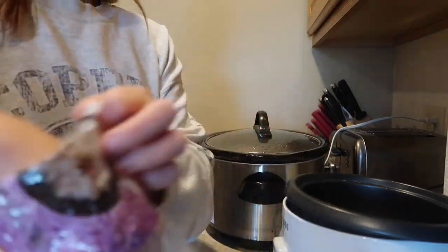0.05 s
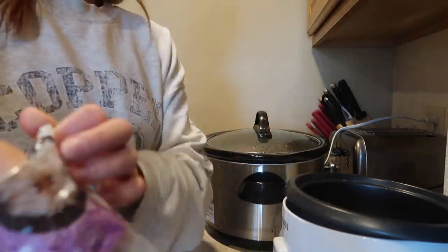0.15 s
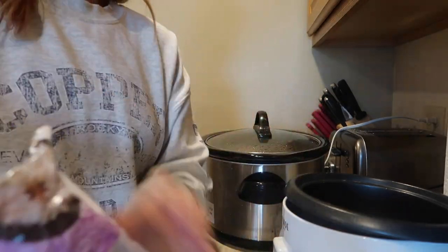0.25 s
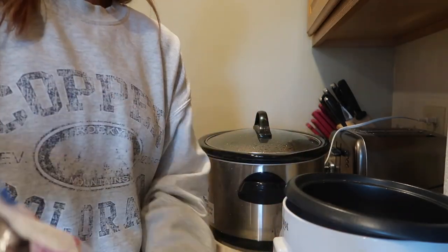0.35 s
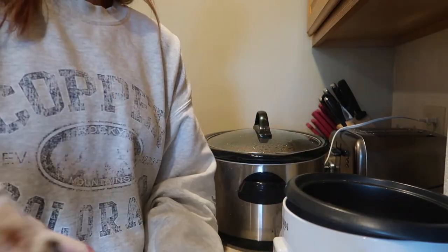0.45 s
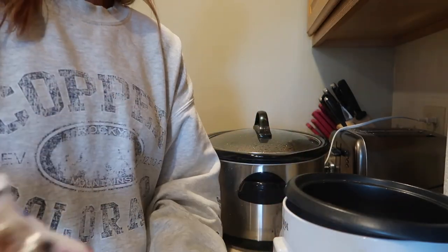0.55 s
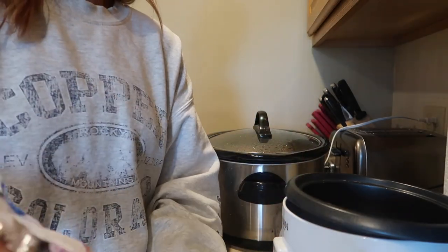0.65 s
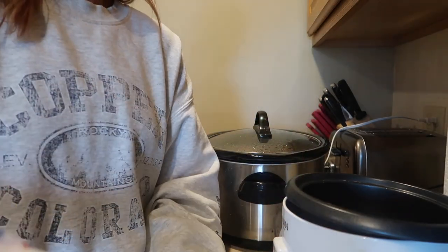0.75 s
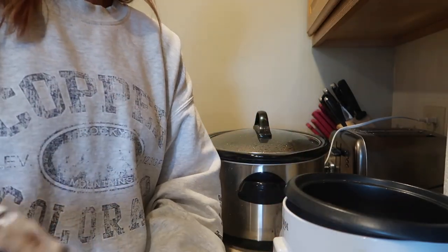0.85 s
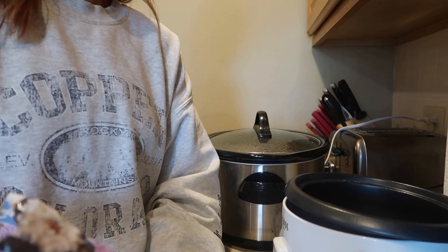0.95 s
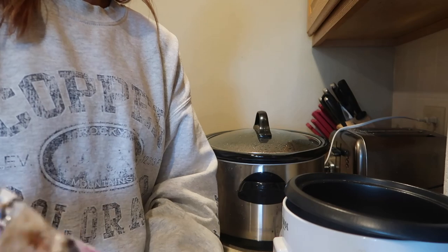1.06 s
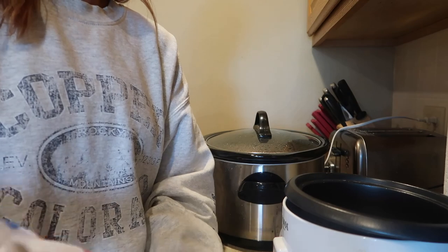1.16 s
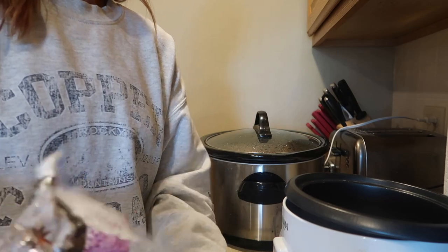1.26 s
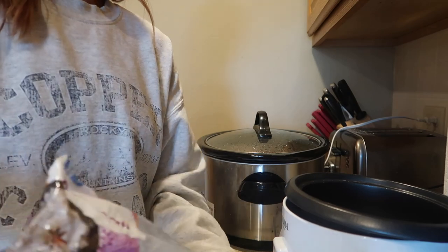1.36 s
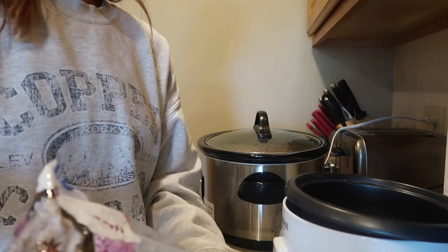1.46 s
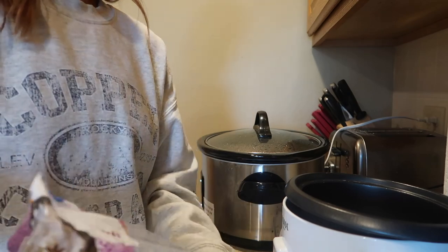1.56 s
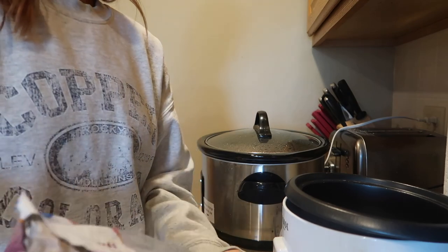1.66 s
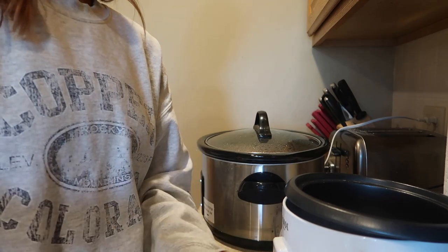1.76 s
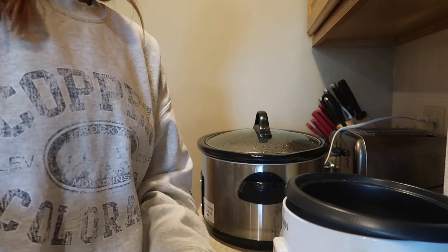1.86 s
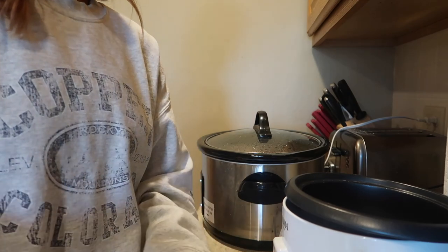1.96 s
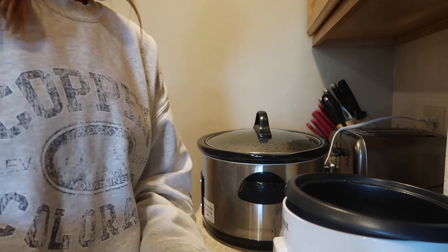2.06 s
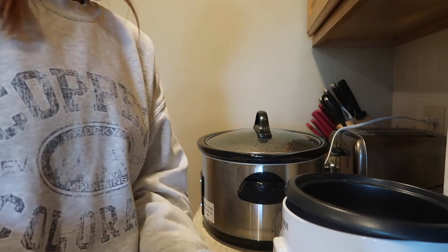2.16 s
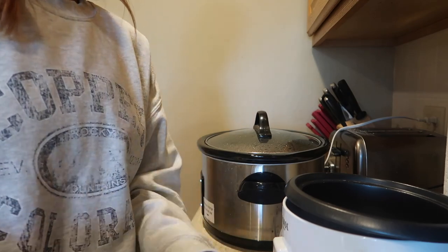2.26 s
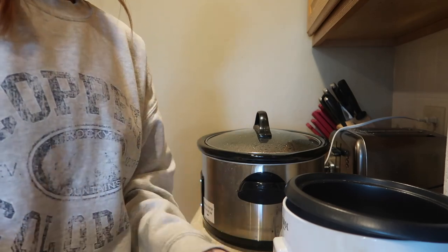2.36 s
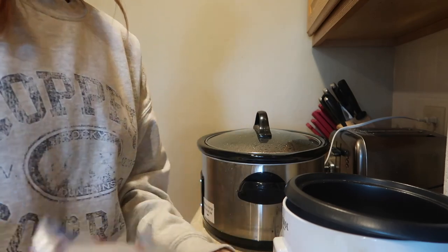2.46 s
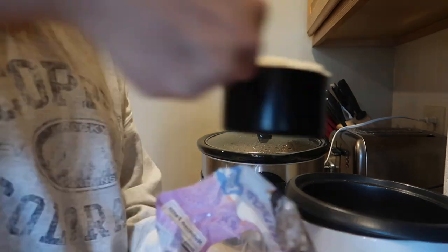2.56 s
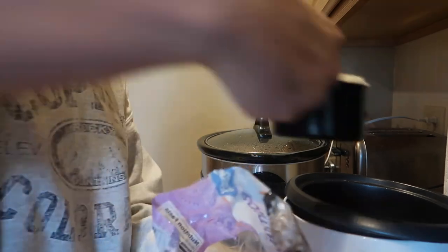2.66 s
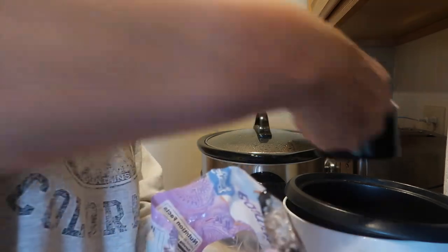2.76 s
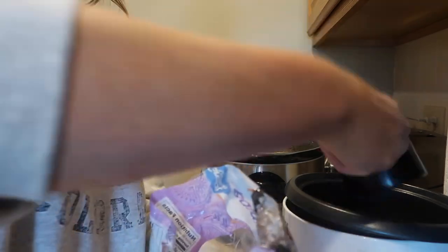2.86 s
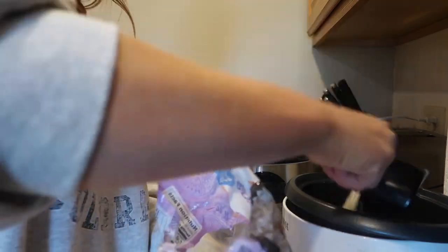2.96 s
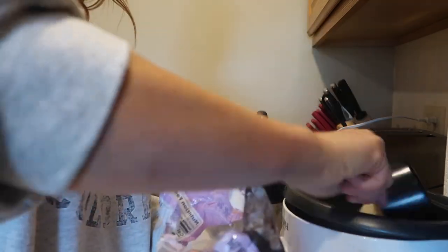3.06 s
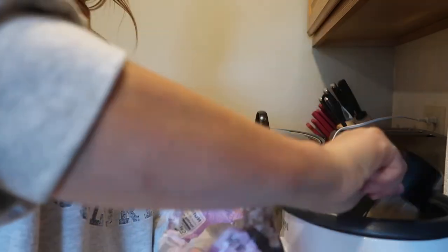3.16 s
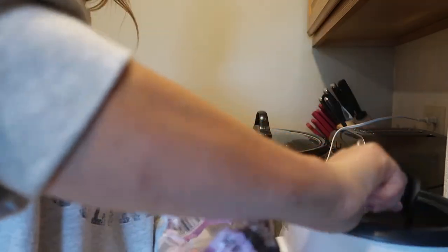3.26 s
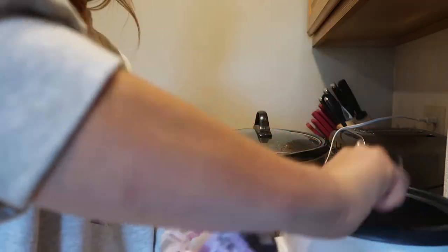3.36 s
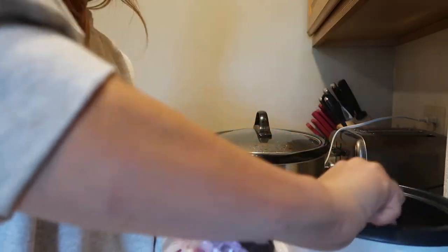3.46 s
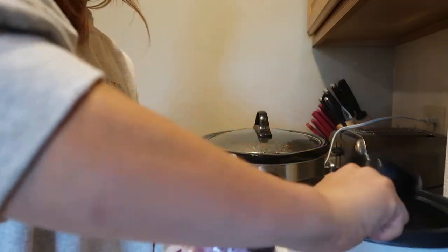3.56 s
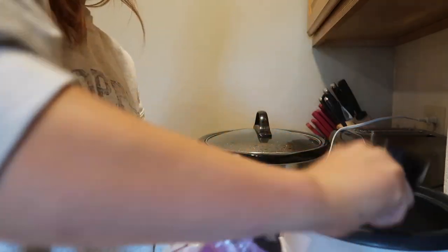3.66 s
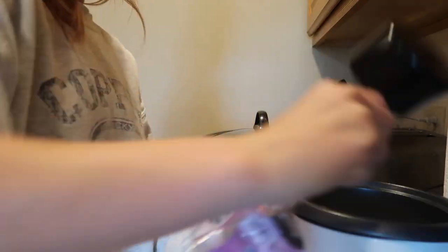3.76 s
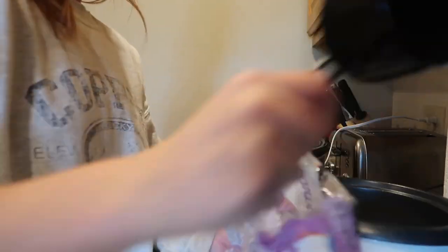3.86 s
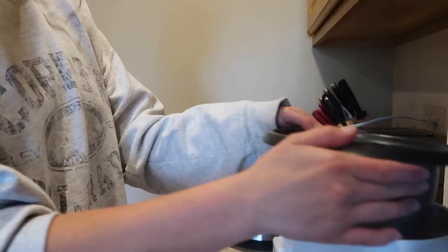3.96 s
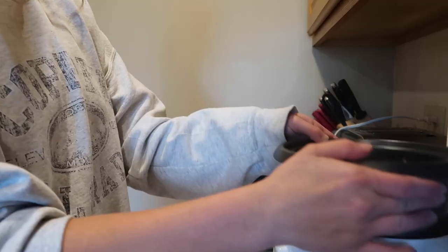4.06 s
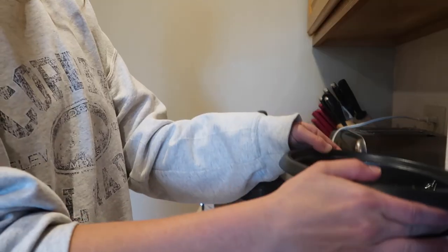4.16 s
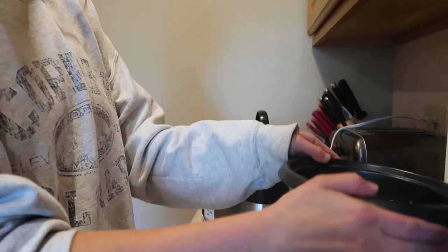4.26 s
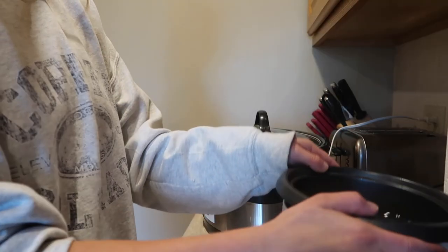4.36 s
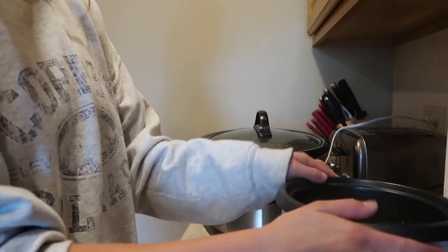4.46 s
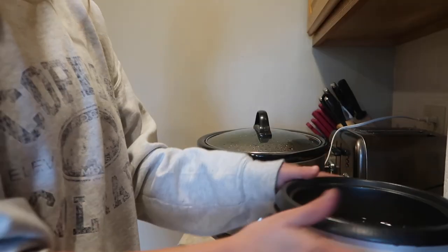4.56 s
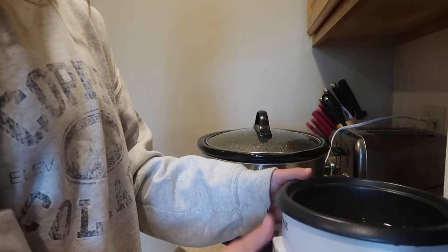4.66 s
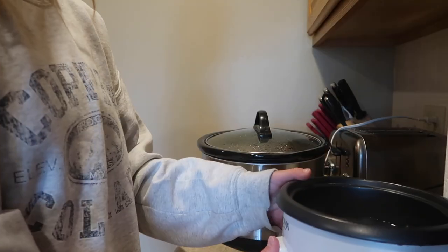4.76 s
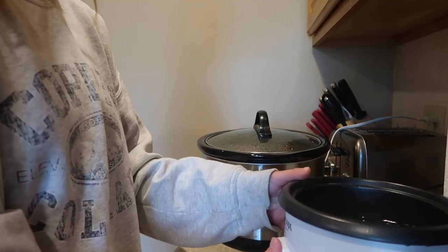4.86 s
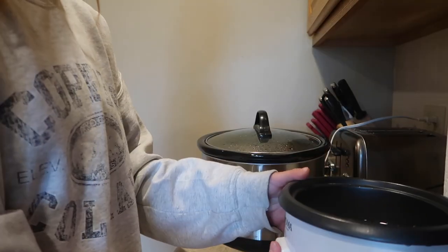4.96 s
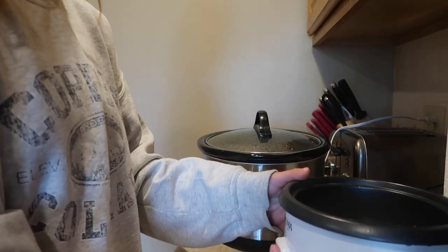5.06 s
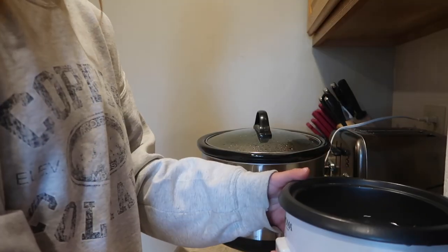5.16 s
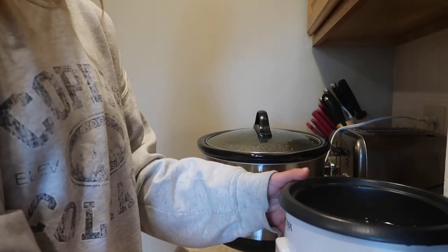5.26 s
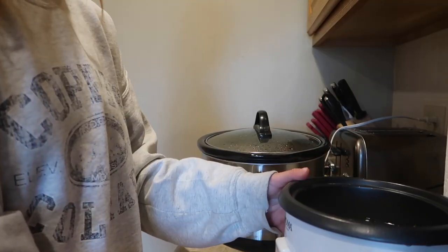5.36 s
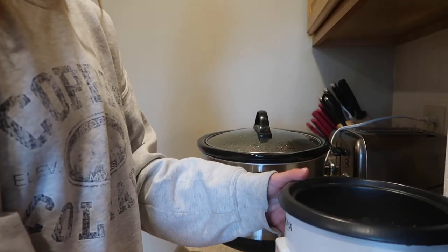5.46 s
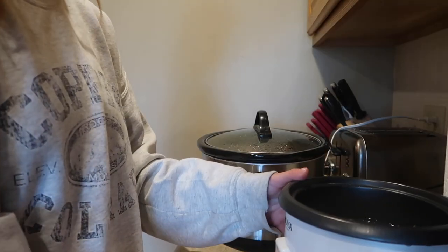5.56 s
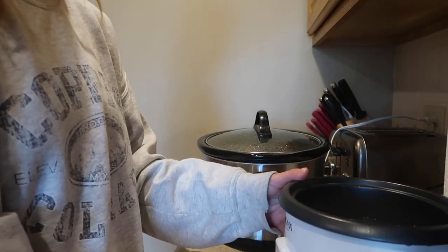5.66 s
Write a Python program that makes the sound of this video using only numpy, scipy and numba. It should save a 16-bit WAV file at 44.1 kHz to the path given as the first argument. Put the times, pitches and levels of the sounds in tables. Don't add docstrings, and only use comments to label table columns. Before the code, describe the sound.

Very close to a small stereo camera in a kitchen, a plastic bag of rice is crumpled with dense crackles and sharp snaps over low counter bumps. A cup knocks, grains burst brightly into a thin metal pot and quickly thin out. The cup clacks on the rim, the pot is shaken and set down with a boomy thud. Faint fridge hum, tiny motor ticks and one last knock end it.

```python
import sys
import numpy as np
from scipy import signal
from scipy.fft import rfft, irfft
from scipy.io import wavfile
from numba import njit

SR = 44100
rng = np.random.default_rng(int(sys.argv[2]) if len(sys.argv) > 2 else 0)


def inscribe(sig):
    pcm = np.round(np.clip(np.atleast_2d(sig).T, -1, 1) * 32767)
    wavfile.write(sys.argv[1], SR, pcm.astype(np.int16))


def invert_db(x):
    u = np.asarray(x, float) / 20
    return 10 ** u


N = 251370
TIME = np.arange(N) / SR


def table(rows, at, log=False):
    x, *columns = np.transpose(rows)
    if log:
        at, x = np.log(at), np.log(x)
    return [np.interp(at, x, c) for c in columns]


def colour(x, points, turn=1):
    hz = np.maximum(np.fft.rfftfreq(x.shape[-1], 1 / SR), 1)
    gain = invert_db(table(points, hz, log=True)[0])
    return irfft(rfft(x) * turn * gain, x.shape[-1])


def resonate(x, peaks):
    out = x
    for hz, width, db in peaks:
        out = out + invert_db(db) * signal.lfilter(*signal.iirpeak(hz, hz / max(width, 5), SR), x)
    return out


@njit
def ring(start, hz, t60, size, rise, n, sr):
    out = np.zeros(n)
    for k in np.flatnonzero(np.abs(size) > 1e-9):
        step = np.exp(2j * np.pi * hz[k] / sr - np.log(1000) / (t60[k] * sr))
        gap_step = np.exp(-hz[k] / (rise * sr))
        z, gap = size[k] + 0j, 1.
        for i in range(int(start[k] * sr), min(n, int((start[k] + t60[k]) * sr))):
            out[i] += z.imag * (1 - gap)
            z, gap = z * step, gap * gap_step
    return out


def tones(s, hz, t60, db, rise=1.0):
    return ring(s, hz + 0. * s, t60 + 0. * s, invert_db(db), rise, N, 1. * SR)


def struck(modes, blows):
    s, db = np.transpose(blows)
    return sum(tones(s, f, np.clip(t60, .01, 1.6), db + g) for f, g, t60 in modes)


def clicks(s, db, dull_db, bright_db, ring_s, mid_hz, slope_db, smear_s, count=6):
    chance = rng.random((len(s), count, 3))
    hz = 280 * (16000 / 280) ** ((np.arange(count) + chance[..., 0]) / count)
    octaves = np.log2(hz / np.reshape(mid_hz, (-1, 1)))
    low, high = np.clip(-octaves / 1.6, 0, 1), np.clip(octaves / 1.4, 0, 1)
    gain_db = db[:, None] + low * dull_db[:, None] + high * bright_db[:, None]
    gain_db = gain_db + np.minimum(slope_db, 0) * np.maximum(octaves - 1.4, 0)
    size = invert_db(gain_db) * (2 * chance[..., 2] - 1)
    start = s[:, None] + smear_s * chance[..., 1]
    t60 = np.reshape(ring_s, (-1, 1)) * (2300 / hz) ** 0.33
    return ring(start.ravel(), hz.ravel(), t60.ravel(), size.ravel(), 0.26, N, 1. * SR)


def patter(curve, rate, scatter_db, ring_s, mid_hz, slope_db, trim_db, burst_db):
    t0, t1 = curve[0][0], curve[-1][0]
    chance = rng.random((6000, 2))
    s = t0 + np.cumsum(-np.log(1 - chance[:, 0])) / rate
    drift = np.arange(400) / 110
    bunch = np.interp(s - t0, drift, rng.standard_normal(400))
    shift = np.interp(s - t0, drift, rng.standard_normal(400))
    db, dull, bright = table(curve, s)
    db = db + trim_db - scatter_db * np.log(1 - chance[:, 1]) + burst_db * bunch
    db[s > t1] = -300
    pitch = mid_hz * 2 ** (0.2 * shift)
    return clicks(np.minimum(s, t1), db, dull + 2 * shift, bright, ring_s, pitch, slope_db, .002)


def swells(rows, at, rest_db):
    s, db, swell, fade = np.transpose(rows)[..., None]
    rising = (s - at) / np.maximum(swell, .001)
    fading = (at - s) / np.maximum(fade, .001)
    each = db - 10 * np.maximum(rising, fading)
    return 10 * np.log10(np.sum(invert_db(2 * each), axis=0) + invert_db(2 * rest_db))


def lean(law, db):
    return law[0] - law[1] * (db + 17.5)


def handling(rows, t0, t1, rest_db, dull, bright):
    t = np.linspace(t0, t1, int((t1 - t0) * 1000))
    db = swells(rows, t, rest_db)
    return np.transpose([t, db, lean(dull, db), lean(bright, db)])


# t/s, level/dB, swell/s per 10 dB, fade/s per 10 dB
SQUEEZES = [(0.02, -13, 9, 0.08), (.09, -16.5, 3, 0.05), (.197, -11, 0.015, 0.0245),
            (.232, -13.5, 0.14, 0.03), (.26, -26, .05, 0.13), (.307, -14, .012, 0.02), (.42, -25, -1.8, 1),
            (.615, -18.5, 0.08, 0.06), (.766, -9, -0.0141, .005), (.776, -5.5, -0.0039, 0.01),
            (.797, -13.5, 0.01, 0.05), (.868, -17, 0.08, 0.15), (.97, -15.5, 0.14, -0.39), (1.09, -5, 0, 0),
            (1.2, -35, 7, 0), (1.35, -17.5, 0.13, 0.18), (1.53, -19, 0.1, 0), (1.65, -14, 0.05, 0.02),
            (1.685, -10.5, 0.0454, 0), (1.755, -16, 0.13, 0.04), (1.82, -21.5, 0.32, 0.03),
            (1.93, -20, 0.19, 0.04), (2.045, -19.5, 0.1, 0.05), (2.13, -14.5, 0.15, 0.22),
            (2.44, -18, 0.15, 0.15), (2.605, -26, 2, 0)]
# level/dB at -17.5 dB effort, gain per dB less
BELLY = (-7, 0.068)
FINE_FILM = (-18.5, 0.12)
# t/s, level/dB added to the belly
RESTING = [(0, -0.5), (.28, -6.5), (.5, 3), (1.06, -1.5), (1.13, 7), (1.24, 0), (2.74, 0.5)]
# t/s, level/dB added to the fine film
FACING = [(0, -0.5), (.7, 2.5), (1.5, -2), (1.9, -0.5), (2.2, -0.5), (2.74, 0.5)]
# f/Hz, width/Hz, level/dB
BAG_BODY = [(467, 116, -12), (630, 53, 5), (933, 17, -5), (2300, 420, -9.5)]


def bag_rustle():
    grip = handling(SQUEEZES, 0, 2.74, -55, BELLY, FINE_FILM)
    grip[:, 2] += table(RESTING, grip[:, 0])[0]
    grip[:, 3] += table(FACING, grip[:, 0])[0]
    stream = patter(grip, rate=2150, scatter_db=2.0, ring_s=0.01, mid_hz=2490, slope_db=-15.0,
                    trim_db=-10.5, burst_db=1.8)
    return resonate(stream, BAG_BODY)


# t/s, level/dB, f/Hz, bright part/dB
SNAPS = [(0.1023, -10.5, 2720, -23), (0.3016, -20, 2300, -11.5), (0.333, -34, 6400, -5),
         (0.3942, -16, 2100, -2), (0.163, -15.5, 3500, -18), (0.7732, -9, 1750, -13.5),
         (0.7945, -6.5, 1600, -14), (0.857, -15, 1450, -31), (0.9561, -7.5, 2590, -23.5),
         (1.0737, -11, 2010, -30), (1.089, -5, 2260, -39), (1.213, -17, 2400, -19.5),
         (0.2204, -10, 2130, -13), (1.3648, -12, 2300, -29), (1.517, -12.5, 2120, -39),
         (1.5353, -10, 2250, -22), (1.7143, -11, 2000, -41.5), (1.855, -10.5, 2400, -11),
         (1.928, -7.5, 2480, -5.5), (2.0325, -8.5, 2100, -13), (2.0659, -3.5, 2750, -22),
         (2.161, -8, 1980, -8), (2.385, -16, 3450, 4.5), (2.4134, -12.5, 2750, -5), (2.4466, -8, 3030, -23),
         (2.737, -25, 2400, -27), (3.0157, -24.5, 2510, -34)]


def bag_snaps():
    s, db, hz, bright = np.transpose(SNAPS)
    crack = clicks(s, db - 2.5, -4.5 + 0 * s, bright, 0.0088, hz, -6, .0016, count=14)
    return resonate(crack + tones(s, hz, 0.0071, db + 1.5), BAG_BODY)


# t/s, level/dB, f/Hz, bright part/dB
CREASES = [(0.0433, -13, 2520, -16), (0.0672, -13, 2920, -14.5), (0.1848, -8, 1900, -18),
           (0.2374, -17, 2470, -20), (0.4369, -13, 1890, -25), (0.4628, -22, 1820, -20),
           (0.5106, -12, 2330, -32), (0.5761, -15.5, 1100, -10.5), (0.6102, -17, 2500, -11),
           (0.7314, -12.5, 1720, -20), (0.7635, -10.5, 2520, -18), (0.8997, -14, 1040, -20),
           (0.9246, -12, 1070, -23), (0.9817, -5.5, 1530, -14.5), (0.318, -11, 1490, -28),
           (1.0772, -12.5, 2180, -17), (1.1218, -9.5, 1030, -15), (1.3054, -12, 1410, -12),
           (1.344, -12.5, 2030, -20), (1.3747, -9, 2070, -21), (1.4523, -16, 2120, -21),
           (1.5858, -12.5, 2130, -24), (1.6257, -15, 1920, -22), (1.6352, -11, 2210, -22),
           (1.6491, -7.5, 2590, -20), (1.6591, -3.5, 2060, -19.5), (1.6854, -11.5, 2350, -23),
           (1.7424, -6, 2580, -20), (1.7494, -11.5, 902, -13), (1.7564, -4.5, 2340, -25),
           (1.7763, -9, 2010, -27), (1.8073, -17, 2080, -29), (1.8383, -11.5, 2500, -27),
           (1.9188, -8, 2210, -17.5), (1.9444, -12, 2360, -6), (1.9757, -10.5, 2090, -18.5),
           (2.0412, -13.5, 2320, -11), (2.1011, -10, 1780, -22), (2.1188, -7.5, 2390, -23.5),
           (2.129, -6, 1090, -16), (2.168, -9, 2130, -17), (2.1946, -10, 2160, -20.5),
           (2.2301, -10.5, 2700, -9), (2.27, -10.5, 2680, -6.5), (2.362, -13.5, 2020, -17.5),
           (2.4236, -5.5, 2550, -19), (2.606, -14, 1280, -13)]


def bag_creases():
    s, db, hz, bright = np.transpose(CREASES)
    db = db - 6
    bright = bright + table(FACING, s)[0]
    folds = clicks(s, db - 3.0, -3.0 + 0 * s, bright, 0.0083, hz, -2.0, .0016, count=14)
    return resonate(folds + tones(s, hz, 0.0074, db), BAG_BODY)


# t/s, level/dB
POUR = [
    (3.03, -51),
    (3.048, -31.5),
    (3.051, -11),
    (3.105, -15.5),
    (3.125, -21),
    (3.17, -20),
    (3.23, -28.5),
    (3.36, -39),
    (3.46, -45),
]
# f/Hz, width/Hz, level/dB
POT = [(1300, 200, 4), (2970, 60, 5.5), (3320, 360, 11), (3750, 44, 12.5), (4836, 46, 7.5),
       (5880, 40, 12.5), (6067, 40, 4), (7170, 37, 9), (10990, 27, 20), (12400, 42, 15)]


def pour():
    curve = []
    for s, db in POUR:
        heap_db = np.interp(s - POUR[2][0], [0, 0.099], [-5.5, 5.5])
        curve.append((s, db, heap_db, 2.5))
    rain = patter(curve, rate=12000, scatter_db=2.5, ring_s=0.0048, mid_hz=3750, slope_db=16,
                  trim_db=-22.5, burst_db=0.3)
    bury_s, buried_db = 0.056, -9.5
    bare = np.maximum(invert_db(-10 * np.clip(TIME - POUR[3][0], 0, 1) / bury_s), invert_db(buried_db))
    return rain + bare * (resonate(rain, POT) - rain)


# t/s, level/dB, f/Hz, bright part/dB, ring/s
KNOCKS = [(2.7432, -8, 2100, -30, 0.04), (2.7608, -8.5, 2750, -33, 0.026), (2.822, -17, 2100, -20, 0.021),
          (2.929, -29, 1660, -11, 0.079), (2.982, -17, 2680, -53, 0.05), (3.3385, -10, 2020, -13.5, 0.065),
          (3.358, -14, 1250, -9, 0.054), (3.636, -23.5, 1460, -7, 0.096), (3.676, -7, 2300, -12, 0.063),
          (3.7564, -14.5, 2750, -27, 0.053), (3.7818, -15.5, 3300, -10.5, 0.05),
          (3.8087, -12, 1370, -0.5, 0.022), (3.8426, -7, 1950, -11.5, 0.07),
          (3.898, -13.5, 1250, -10.5, 0.033), (3.9303, -8.5, 2210, -12, 0.04),
          (3.9403, -13, 2680, -9, 0.023), (3.951, -2, 1750, -9, 0.021), (4.0907, -23.5, 2100, -20, 0.066),
          (4.2746, -25, 3650, -12.5, 0.063), (4.446, -17.5, 2650, -11, 0.046),
          (4.5091, -15, 3750, -12, 0.063), (4.5841, -18.5, 1750, -11, 0.11),
          (4.933, -37.5, 1233, -2.5, 0.057), (5.548, -39, 2900, 9, 0.094), (5.6527, -13, 2230, -8, 0.041)]
# level/dB at -17.5 dB, gain per dB less
KNOCK_DULL = (-9, 0.24)
# f/Hz, width/Hz, level/dB
RIM = [(1345, 35, -1), (2053, 43, -7.5), (2750, 45, -18), (3760, 93, -1.5)]


def knocks():
    s, db, hz, bright, ring_s = np.transpose(KNOCKS)
    dull = lean(KNOCK_DULL, db)
    ring_s = np.clip(ring_s, .008, .3)
    hard_db = db - 14 * np.log10(ring_s / .04)
    crack = clicks(s, hard_db + 0.5, dull, bright, 0.0021, hz, -15.5, .0006, count=14)
    crack += tones(s, hz, 0.0035, hard_db, rise=0.26)
    wall = clicks(s, db - 19.5, dull, bright, ring_s, hz, -14.5, 0.0032, count=54)
    wall += tones(s, hz, 0.19 * ring_s, db - 34)
    return crack + resonate(wall, RIM)


# t/s, level/dB, swell/s, fade/s (per 10 dB)
JOLTS = [
    [(2.742, -18, 0.0039, 0.015), (3.022, -33.5, 0.055, 0.11)],
    [(3.68, -12.5, 0.0044, 0.029), (3.76, -37, 0.17, 0.17), (3.85, -23, 0.069, 0.087),
     (3.93, -17.5, 0.017, 0.016), (3.968, -29, 0.03, 0.006), (4.1, -56, .2, 0.041),
     (4.28, -39, 0.004, 0.12), (4.448, -14.5, 0.0016, 0.069), (4.52, -27, 0.037, .11),
     (4.83, -51, 0.0092, 0.055), (5.01, -60, .07, .08)],
    [(5.656, -47, 0.0024, .04)],
]
# level/dB at -17.5 dB effort, gain per dB less
HOLLOW = (-5, 0.21)
SHIFT_SIZZLE = (-16, 0.097)


def grain_rattle():
    out = np.zeros(N)
    for jolts, tail_s in zip(JOLTS, (.02, .12, .045)):
        curve = handling(jolts, jolts[0][0] - 0.04, jolts[-1][0] + tail_s, -66, HOLLOW, SHIFT_SIZZLE)
        out += patter(curve, rate=4000, scatter_db=2.0, ring_s=0.0095, mid_hz=2520, slope_db=-24.5,
                      trim_db=-12.5, burst_db=3.0)
    return resonate(out, RIM)


# f/Hz, level/dB, ring/s
BOWL = [(1364, -14, 1.4), (1581, -7, 0.5), (1703, -14, 1.0), (1742, -8, 0.8), (2896, -18, 0.9),
        (2908, -17, 1.0)]
# t/s, level/dB
BOWL_BLOWS = [
    (2.929, -8),
    (3.056, -14),
    (3.195, -4),
    (3.338, -10),
    (3.676, -14),
    (3.782, -12),
]
# f/Hz, level/dB, ring/s
CUP = [(1098, -1.5, 0.12), (2180, -2.5, 0.067), (2440, -3.5, 0.098), (2925, -10, 0.24), (4960, -12, 0.095),
       (5930, -16, 0.093)]
# t/s, level/dB
CUP_TAPS = [(3.677, -21), (3.70, -33.5), (3.756, -38), (3.782, -36), (3.809, -33.5), (3.843, -30)]
# f/Hz, level/dB, ring/s
LID = [(1540, -4, .08), (3650, -3, .05), (3590, -17, .6), (5560, -11, .05)]
# t/s, level/dB
LID_TAPS = [
    (4.2746, -36.5),
]
# f/Hz, level/dB, ring/s
HOUSING = [(580, -2, 0.042), (1294, -4, 0.12), (1428, -3, 0.081), (2276, -9, 0.08), (2750, -3, 0.042),
           (3220, -11.5, 0.065), (3833, -15, 0.026), (3950, -10, 0.055)]
# t/s, level/dB
HOUSING_BLOWS = [(4.446, -19), (4.459, -20), (4.487, -32), (4.509, -23), (4.584, -45), (4.654, -45)]


def ringing_parts():
    bowl = invert_db(-32.5) * struck(BOWL, BOWL_BLOWS)
    return bowl + struck(CUP, CUP_TAPS) + struck(HOUSING, HOUSING_BLOWS) + struck(LID, LID_TAPS)


# t/s, level/dB, f/Hz, ring/s
THUDS = [(0.187, -22, 382, 0.11), (0.804, -16, 526, 0.025), (0.552, -28.5, 1086, 0.15),
         (.93, -22, 1070, 0.095), (1.077, -15, 610, 0.03), (1.09, -14, 497, 0.031),
         (1.104, -16.5, 317, 0.046), (1.113, -19, 412, .04), (1.122, -14.5, 566, 0.047),
         (1.135, -21, 810, 0.023), (1.149, -9.5, 540, 0.02), (1.165, -22, 694, 0.022),
         (1.725, -20, 536, 0.043), (1.75, -17.5, 598, 0.065), (1.922, -17.5, 597, 0.041),
         (2.038, -18, 502, 0.046), (2.119, -14, 562, 0.035), (2.187, -16.5, 480, 0.028),
         (2.315, -17, 455, 0.037), (2.472, -19, 516, 0.041), (2.509, -26.5, 470, 0.045),
         (2.744, -19.5, 630, 0.03), (2.69, -29.5, 302, 0.041), (2.826, -31.5, 686, 0.065),
         (2.985, -26, 252, 0.091), (2.98, -22.5, 630, 0.031), (3.13, -16.5, 518, 0.051),
         (3.168, -25.5, 392, 0.072), (3.951, -12, 1060, 0.02), (3.843, -18.5, 1236, 0.033),
         (3.92, -23, 655, 0.024), (3.929, -20.5, 700, 0.021), (3.98, -19, 625, 0.046),
         (3.994, -23, 571.5, 0.09), (4.27, -33.5, 314, 0.082), (4.447, -10.5, 396, 0.026),
         (4.507, -10.5, 442, 0.029), (4.822, -28.5, 403, 0.027), (5.072, -30, 312, 0.044),
         (5.075, -44, 920, 0.042), (5.653, -26, 299, 0.063)]


def thuds():
    s, db, hz, ring_s = np.transpose(THUDS)
    ring_s = np.clip(ring_s, .02, .3)
    out = np.zeros(N)
    for ratio, gain_db in [(.79, -5), (1, 2), (1.27, -14), (1.62, -10)]:
        out += tones(s, hz * ratio, ring_s, db + gain_db, rise=0.42)
    return out


# t/s, level/dB, swell/s, fade/s (per 10 dB)
SLIDES = [
    [(3.485, -39, 0.011, 0.055), (3.535, -41.5, 0.044, 0.012), (3.57, -53.5, 0.041, 0.041)],
    [(5.48, -65.5, 0.033, .4), (5.553, -55.5, 0.006, 0.14), (5.61, -52.5, 0.031, 0.018)],
]
# f/Hz, level/dB
SLIDE_COLOUR = [
    [(3000, -17.5), (5200, -22), (6400, -13), (9000, -14), (11500, -7.5), (16000, -16)],
    [(2000, -11), (3000, 6), (5500, 12), (8500, 5), (12000, -3), (16000, -30)],
]
# f/Hz, width/Hz, level/dB
SLIDE_RING = [(6210, 136, 7.5), (6900, 85, 4)]


def slides():
    out = np.zeros(N)
    for rows, points in zip(SLIDES, SLIDE_COLOUR):
        hiss = resonate(colour(rng.standard_normal(N), points), SLIDE_RING)
        flutter_db = 2.0 * np.interp(TIME, np.arange(400) / 60, rng.standard_normal(400))
        out += hiss / hiss.std() * invert_db(swells(rows, TIME, -140) + flutter_db)
    return out


# t/s, level/dB, swell/s, fade/s (per 10 dB)
SCRAPES = [(2.87, -50.5, 0.054, .05), (4.12, -52, .03, 0.04), (4.225, -54, 0.03, 0.06),
           (4.87, -60, .03, .04), (5.02, -56, 0.06, 0.05)]
# f/Hz, width/Hz, level/dB
SCRAPE_RING = [(1450, 150, 0), (2080, 100, 7), (2850, 150, -3)]


def scrapes():
    rub = rng.standard_normal(N)
    rung = resonate(rub, SCRAPE_RING) - rub
    return rung / rung.std() * invert_db(swells(SCRAPES, TIME, -140))


# t/s, level/dB, f/Hz, ring/s
THUMPS = [(0.051, -25.5, 94, 0.4), (0.39, -20, 183, 0.11), (0.798, -28, 94, 0.37), (0.935, -6.5, 129, 0.24),
          (1.0, -15, 142, 0.2), (1.073, -12.5, 127, 0.25), (1.16, -18.5, 121, 0.098),
          (2.199, -21.5, 160.8, 0.91), (2.399, -29, 251, 0.091), (2.658, -26, 176.3, 0.28),
          (2.741, -30, 124, 0.23), (3.168, -11, 118, 0.14), (3.337, -29, 119.5, 0.53),
          (3.779, -25.5, 177, 0.2), (3.843, -20.5, 176, 0.23), (3.974, -13.5, 135.4, 0.21),
          (4.043, -22.5, 114.4, 0.098), (4.269, -26, 159, 0.072), (4.511, -1.5, 144.6, 0.31),
          (4.55, -4, 160, 0.058), (4.817, -27.5, 172, 0.18), (5.068, -32, 177, 0.2),
          (5.653, -19.5, 175, 0.31)]
# f/Hz, level/dB
COUNTER = [(124, 1.5), (152.5, 1), (61.5, -13.5), (223, -1)]


def counter():
    s, db, hz, ring_s = np.transpose(THUMPS)
    ring_s = np.clip(ring_s, .03, .6)
    blows = tones(s, hz, 1.1 * ring_s, db - 5.5, rise=0.49)
    for f, gain_db in COUNTER:
        blows += tones(s, f, ring_s, db + gain_db - 13.0, rise=0.88)
    shuffle = colour(rng.standard_normal(N), [(20, -38.0), (55, -50.0), (100, -1.5), (125, -2.5),
                                              (160, -2.5), (210, -9.0), (300, -19.0), (600, -63.5)])
    t = TIME[::100]
    after_db = swells([(a, b - 17.5, 0.03, 0.064) for a, b, *_ in THUMPS], t, -53.5)
    under_db = swells(SQUEEZES, t, -83) - 21
    shaking = np.hypot(invert_db(after_db), invert_db(under_db))
    return blows + shuffle / shuffle.std() * np.interp(TIME, t, shaking)


TICKS = [1, 2, 4, 5, 5.5, 7, 8, 10, 11, 12, 14, 15, 16]


def lens_motor():
    s = 4.927 + np.array(TICKS) / 29.97
    return sum(tones(s, hz, 0.0074, -55 + rng.standard_normal(len(s))) for hz in (3850., 4350., 4850.))


# f/Hz, time to fade by 60 dB/s
ROOM_T60 = [(100, 0.66), (1000, 0.22), (4000, 0.1), (12000, 0.2)]


def room(x):
    t = np.arange(SR // 2) / SR
    noise = rng.standard_normal((2, len(t)))
    tail = np.zeros((2, len(t)))
    for f in 80 * 2 ** np.arange(8):
        band = signal.lfilter(*signal.butter(1, [f, 1.99 * f], "band", fs=SR), noise)
        tail += band * invert_db(-60 * t / table(ROOM_T60, f * 1.69, log=True)[0])
    tail *= np.clip((t - .002) / 0.0007, 0, 1)
    return signal.fftconvolve(x[None], tail / np.sqrt(np.sum(tail[0] ** 2)), axes=1)[:, :N]


# f/Hz, level/dB
HUM = [(64.6, -44.5), (118.4, -44), (172.3, -43.5)]


def fridge():
    return sum(invert_db(db - 9.0) * np.sin(2 * np.pi * hz * TIME) for hz, db in HUM)


# f/Hz, level/dB
FLOOR = [(25, -27), (54, 9), (91, -14), (124, -4.5), (213, 0), (8150, -37.5), (12000, -37), (15600, -56)]


def air_hiss():
    both = colour(rng.standard_normal((2, N)), FLOOR)
    both *= invert_db(-54) / both[0].std()
    both[1] = colour(both[1], [(60, -19.5), (130, -11.5), (300, -8.0), (3000, -2), (7000, -1.0), (12000, 10)])
    return both


# f/Hz, level/dB
PORTS = [(60, -43), (300, -33), (1300, -26), (2400, -22), (4400, -13), (8000, -2), (12000, 11), (16000, 9)]
# f/Hz, level/dB
DIFFUSE = [(150, -47), (450, -29), (1500, -26), (2800, -19), (4200, -2), (8000, 6), (12000, 3),
           (16000, -10)]
# t/s, share of the near sound leaning left
BEARING = [(0, -.003), (3.2, -.04), (3.7, .04), (4.1, -.02)]
# f/Hz, level/dB
MIC = [(20, -1.5), (60, 1), (120, -1.5), (8000, 9.5), (10000, 5.5), (13000, 2.5), (16000, -4.5)]


def scene():
    near = bag_rustle() + bag_snaps() + bag_creases() + pour()
    near = near + knocks() + grain_rattle() + ringing_parts() + thuds() + slides()
    low = counter()
    wet = room(near + invert_db(-7.5) * low) * invert_db(-9)
    mid = near + low + wet[0]
    body = rng.standard_normal((3, 2400)) * invert_db(-np.arange(2400) / 50)
    paths = signal.fftconvolve(mid[None], body / np.sqrt(np.sum(body[0] ** 2)), axes=1)[:, :N]
    turns = np.array([np.interp(TIME, np.arange(40) / 5, w) for w in rng.standard_normal((3, 40))])
    stray = np.sum(paths * turns, axis=0) / np.sqrt(np.sum(turns ** 2, axis=0)) + wet[1]
    mid = mid + scrapes()
    skew_rad = -0.16
    side = colour(mid, PORTS, turn=-1j * np.exp(1j * skew_rad)) + colour(stray, DIFFUSE)
    side += table(BEARING, TIME)[0] * near
    hiss = air_hiss()
    side += hiss[1]
    mid = mid + hiss[0] + fridge() + lens_motor()
    return colour(np.array([mid + side, mid - side]), MIC)


def top_cut(x):
    return signal.sosfilt(signal.butter(12, 16520, fs=SR, output="sos"), x)


# start t/s, end t/s, depth (to 1 cuts deep bass, to 2 low middle)
LOW_CUT = [(3.064, 3.141, 3.2), (3.136, 3.284, 0.76), (3.49, 3.645, 1.8), (3.65, 3.88, 1.33),
           (3.852, 3.96, 1.9), (3.95, 5.75, 0.18)]


def record(dry):
    deep, low = (signal.sosfiltfilt(signal.butter(2, hz, fs=SR, output="sos"), dry) for hz in (110., 480.))
    ramp_s = 0.027
    steps = [d * np.clip(np.minimum(TIME - a, b - TIME) / ramp_s + .5, 0, 1) for a, b, d in LOW_CUT]
    depth = np.max(steps, axis=0)
    thin = dry - .92 * (np.clip(depth, 0, 1) * deep + np.clip(depth - 1, 0, 1) * (low - deep))
    mix = np.tanh(0.58 * thin) / 0.63
    return top_cut(mix)


dry = scene()
out = record(dry)
inscribe(out)
```